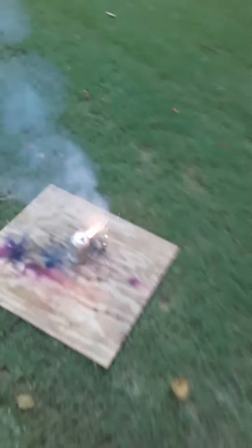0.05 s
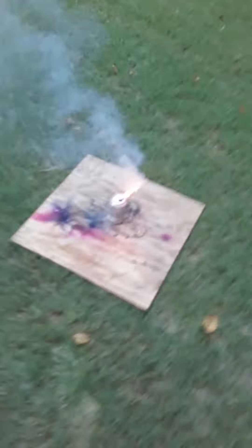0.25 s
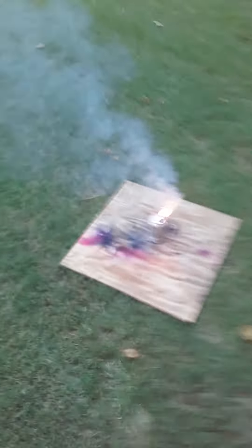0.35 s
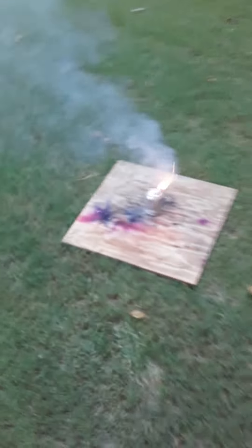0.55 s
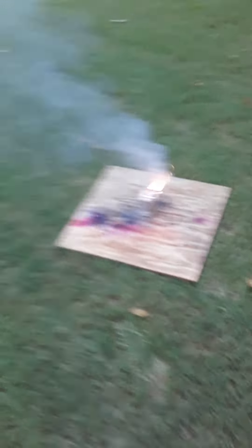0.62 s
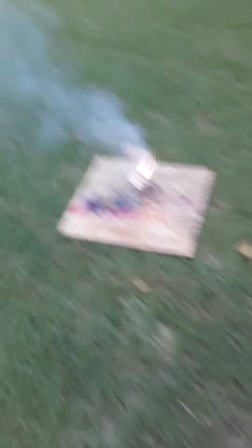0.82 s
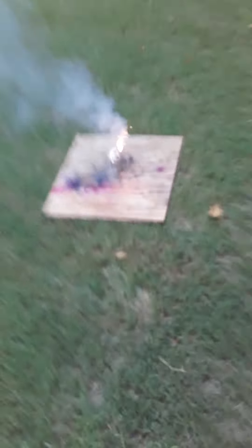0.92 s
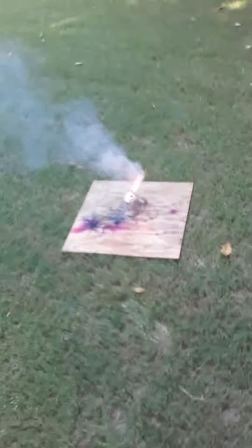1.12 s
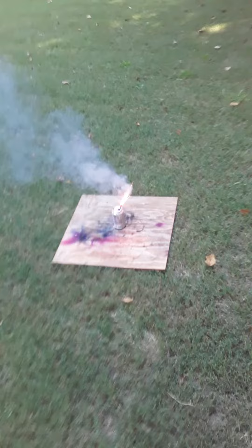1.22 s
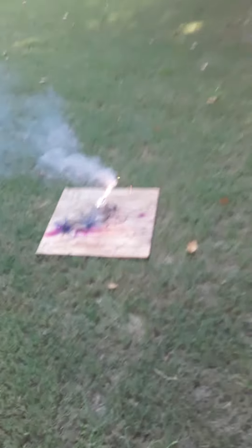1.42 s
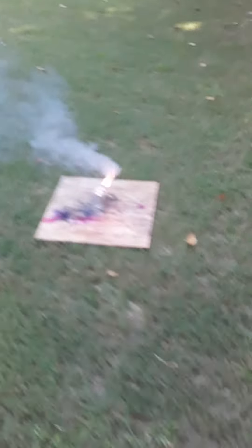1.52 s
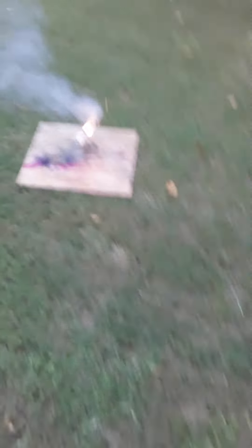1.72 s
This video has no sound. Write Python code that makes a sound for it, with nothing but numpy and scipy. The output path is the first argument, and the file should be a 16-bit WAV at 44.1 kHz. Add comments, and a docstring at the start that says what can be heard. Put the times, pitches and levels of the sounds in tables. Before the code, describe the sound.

Faint hiss of burning sparklers with tiny spits, and an early loud microphone handling thump.

```python
"""Sparklers on a lawn, with handling noise.

Sparklers burn on a board: gas hiss, a fizz of tiny sparks and a few spits, over a low outdoor murmur
and a faint hum. A finger rubs and ticks beside the right microphone port, then drags across it with
one dull thump; a limiter ducks both channels for that moment. The hand softly knocks the case."""
import sys
import numpy as np
from scipy import signal
from scipy.fft import rfft, irfft
from scipy.io import wavfile
from scipy.ndimage import uniform_filter1d

SR = 44100
rng = np.random.default_rng(int(sys.argv[2]) if len(sys.argv) > 2 else 0)


def digitize_waveform(pressure):
    """Quantize a signal to 16-bit integers and store it at the path in sys.argv[1].

    Rows of a 2-D input are taken as channels; values are limited to [-1, 1].
    """
    field = np.atleast_2d(pressure).T
    bounded = np.clip(field, -1, 1)
    quanta = np.round(bounded * 32767).astype(np.int16)
    wavfile.write(sys.argv[1], SR, quanta)


N = 77175
T = np.arange(N) / SR

# gas hiss: time_s, level_db
HISS_ENVELOPE = [(0, -49), (.17, -46.5), (.28, -51), (.45, -56), (.7, -59.5), (.98, -61), (1.09, -59),
                 (1.26, -61), (1.4, -59), (1.53, -55), (1.6, -54.5), (1.75, -52.5)]
# freq_hz, density_db
HISS_SPECTRUM = [(200, -4), (600, 0), (1200, 0.5), (2300, 1.5), (3200, -1), (4400, -9.5), (6800, -1.5),
                 (8300, -11), (10000, -8.5), (12500, -2.5), (15500, 0)]
# sizzle as the flame flares: time_s, level_db
SIZZLE_ENVELOPE = [(0, -51.5), (.35, -55), (.6, -66.5), (.98, -67.5), (1.08, -62), (1.25, -64),
                   (1.4, -59.5), (1.53, -54.5), (1.6, -61.5), (1.75, -58.5)]
# freq_hz, density_db
SIZZLE_SPECTRUM = [(500, -22), (1300, -4), (2100, 1), (3000, -2.5), (4300, -2), (5500, -4), (6700, -2.5),
                   (8300, -30.5), (15500, -19.5)]
# hiss and sizzle, right port relative to left: freq_hz, gain_db
RIGHT_EQ = [(300, -2.5), (1500, -2), (2700, 1.5), (4200, -0.5), (5500, -1), (7000, -6.5), (9000, 1),
            (12000, -5.5), (15000, -3.5)]

# outdoor murmur: time_s, level_db
MURMUR_ENVELOPE = [(0, -53.5), (.13, -52.5), (.29, -55.5), (.42, -61.5), (.7, -65), (1, -65), (1.28, -66),
                   (1.5, -58), (1.65, -58), (1.75, -57.5)]
# freq_hz, density_db
MURMUR_SPECTRUM = [(15, -57), (45, -12.5), (80, -1), (160, -0.5), (250, 0), (370, -2.5), (520, -4.5),
                   (750, -9.5), (1500, -13), (4000, -30.5)]

# skin rubbing the case: time_s, level_db
RUB_ENVELOPE = [(0, -37), (.04, -38), (.08, -38.5), (.15, -41.5), (.186, -38), (.2, -35), (.24, -46.5),
                (.35, -51.5), (.5, -56.5), (.75, -73), (1.1, -70), (1.75, -74)]
# freq_hz, density_db
RUB_SPECTRUM = [(100, -21), (1000, -14), (2900, -16.5), (4100, 1), (4800, -4), (5600, -2.5), (7600, -13.5),
                (10500, -3), (13000, -2.5), (15000, -1)]
# finger drags across the port: start_s, hold_s, level_db
DRAG_EVENTS = [(0.016, 0.007, -39), (0.1975, 0.0098, -30.5), (0.208, 0.011, -9.5)]
# freq_hz, density_db
DRAG_SPECTRUM = [(40, 0.5), (160, -4), (300, -10), (390, -9.5), (480, -4.5), (780, -1.5), (1100, -7),
                 (1450, -6.5), (2000, -19.5), (3000, -22.5), (4200, -21), (6500, -43.5), (9000, -50),
                 (15000, -45)]
# resonances of the half-covered port: freq_hz, width_hz, lift_db
PORT_MODES = [(447, 31, 8), (580, 54, 7.5), (1903, 64, 11), (2340, 110, 8.5)]
# hand knocks on the case: start_s, level_db, decay_s
KNOCK_EVENTS = [(0.0204, -30.5, 0.0033), (0.712, -52.5, 0.007)]
# freq_hz, density_db
KNOCK_SPECTRUM = [(40, -17), (120, 3.5), (300, 2.5), (600, 0.5), (900, -4.5), (1500, -10.5), (2400, -1.5),
                  (4000, -12), (7000, -17), (9000, -26)]
# skin catches on the case: start_s, level_db
TICK_EVENTS = [(0.0314, -21), (0.044, -24), (.175, -27.5), (0.1942, -15), (0.1996, -15)]
# freq_hz, density_db
TICK_SPECTRUM = [(2500, -14), (5000, -5.5), (7600, -12), (11000, -4.5), (15000, -0.5)]
# pressure jolts at the port: start_s, gain_db
JOLT_EVENTS = [(.2054, 4), (0.219, 8)]
# skin slips during the drag: start_s, level_db
SLIP_EVENTS = [(.2082, -5), (.217, -4.5)]
# port ring after a slip: freq_hz, gain_db, decay_s
SLIP_RING = [(510, 0, .0023), (799, -7.5, .0018)]

# sparkler spits: start_s, level_db, crack_decay_s, crack_share, pitch_hz
SPIT_EVENTS = [(0.362, -43, 0.0025, 0.8, 2740), (.591, -50, 0.0014, 1, 2520), (.709, -50, .002, .6, 2520),
               (1.0165, -51.5, .0008, 0.7, 2600), (1.0327, -42.5, 0.00099, 0.83, 2330),
               (1.092, -48, .002, 0, 2660), (1.147, -51, 0.0009, 0.6, 2600),
               (1.5436, -45, .0007, 0.1, 2960), (1.5606, -39, 0.0012, 0.01, 1770),
               (1.6283, -37, 0.00039, 0.07, 2230)]
# crack of a spark: freq_hz, density_db
CRACK_SPECTRUM = [(300, 1), (2000, -21.5), (6000, -3), (8300, 1), (12000, 7), (16000, 10)]
# pop of a spit: pitch_ratio, gain_db, decay_s
POP_MODES = [(1, -4.5, .0012), (1.42, -4, .0005), (2.17, 2.5, .0005)]


def amp(db):
    """Decibels to gain."""
    return 10 ** (np.asarray(db) / 20)


def unit(x):
    """Scale to rms 1."""
    return x / np.sqrt(np.mean(x ** 2))


def curve(points):
    """Gain over time from (time_s, level_db) points."""
    return amp(np.interp(T, *np.array(points).T))


def colour(x, points):
    """Filter by (freq_hz, gain_db) points on a log-frequency axis."""
    hz, db = np.array(points).T
    bins_hz = np.maximum(np.fft.rfftfreq(N, 1 / SR), 1)
    return irfft(rfft(x) * amp(np.interp(np.log(bins_hz), np.log(hz), db)), N)


def noise(spectrum, channels=1):
    """Coloured noise, rms 1, independent per channel."""
    return unit(colour(rng.standard_normal((channels, N)), spectrum))


def walk(rate_hz):
    """Smooth random wander, rms 1."""
    step = max(int(SR / rate_hz), 1)
    return unit(uniform_filter1d(rng.standard_normal(N)[np.arange(N) // step], step))


def grains(per_s, spread_db):
    """Random clicks of uneven size."""
    size = amp(spread_db * np.minimum(rng.exponential(size=N), 5))
    return (rng.random(N) < per_s / SR) * size * rng.choice([-1, 1], N)


def burst(x, start_s, attack_s, decay_s, hold_s=0):
    """Attack-hold-decay cut of x, rms 1 at its top."""
    env = np.exp(np.minimum(T - start_s, 0) / attack_s - np.maximum(T - start_s - hold_s, 0) / decay_s)
    return x * env * np.sqrt(np.mean(env ** 2) / np.mean((x * env) ** 2))


def ring(age_s, modes):
    """Sum of damped sines."""
    return sum(amp(db) * np.sin(2 * np.pi * hz * age_s) * np.exp(-age_s / decay_s)
               for hz, db, decay_s in modes)


def at_right_port(x, left_db=-56.5):
    """Sound on the right port, leaking faintly left."""
    return x * np.array([[amp(left_db)], [1]])


def sparklers(fizz_db=-9, flicker_db=1.25):
    """Gas hiss and the sizzle of tiny sparks, flickering together."""
    sparks = np.array([grains(per_s=2200, spread_db=2.5) for _ in range(2)])
    hiss = unit(noise(HISS_SPECTRUM, channels=2) + amp(fizz_db) * unit(colour(sparks, HISS_SPECTRUM)))
    sizzle = unit(noise(SIZZLE_SPECTRUM, channels=2) + unit(colour(sparks, SIZZLE_SPECTRUM)))
    burn = hiss * curve(HISS_ENVELOPE) + sizzle * curve(SIZZLE_ENVELOPE)
    left, right = burn * amp(flicker_db * walk(rate_hz=45.1))
    return np.array([left, colour(right, RIGHT_EQ)])


def sputter(gain_db=-19.5):
    """Small sparks crack at random, following the hiss level."""
    cracks = unit(colour(grains(per_s=190, spread_db=3.5), CRACK_SPECTRUM))
    return cracks * amp(gain_db) * curve(HISS_ENVELOPE)


def outdoors(side_db=-13.5, hum_hz=238.6, hum_db=-8.5, waver_ratio=0.014, waver_db=3.2):
    """Low, near-mono murmur with a wavering hum."""
    mid = noise(MURMUR_SPECTRUM)
    side = amp(side_db) * noise(MURMUR_SPECTRUM) * np.array([[1], [-1]])
    pitch_hz = hum_hz * (1 + waver_ratio * walk(rate_hz=25.08))
    hum = unit(np.sin(2 * np.pi * np.cumsum(pitch_hz) / SR) * amp(waver_db * walk(rate_hz=8.9)))
    return (mid + side + amp(hum_db) * hum) * curve(MURMUR_ENVELOPE)


def rubbing(flicker_db=1.2):
    """Skin slides on the case: a bright, grainy rustle."""
    friction = unit(colour(grains(per_s=6000, spread_db=3), RUB_SPECTRUM))
    slide = friction * curve(RUB_ENVELOPE) * amp(flicker_db * walk(rate_hz=120))
    return at_right_port(slide, left_db=-46.5)


def drags():
    """The finger scrapes over the port, exciting its resonances."""
    bins_hz = np.fft.rfftfreq(N, 1 / SR)
    port = 1 + sum((amp(db) - 1) / (1 + 2j * (bins_hz - hz) / width_hz)
                   for hz, width_hz, db in PORT_MODES)
    scrape = irfft(rfft(noise(DRAG_SPECTRUM)) * port, N)
    return at_right_port(sum(amp(db) * burst(scrape, start_s, hold_s=hold_s, attack_s=0.0013,
                                             decay_s=0.0016) for start_s, hold_s, db in DRAG_EVENTS))


def knocks(uncorrelated_db=6.5):
    """The hand shifts grip and bumps the case, heard at both ports."""
    case = noise(KNOCK_SPECTRUM) + amp(uncorrelated_db) * noise(KNOCK_SPECTRUM, channels=2)
    return sum(amp(db) * burst(case, start_s, attack_s=0.00038, decay_s=decay_s)
               for start_s, db, decay_s in KNOCK_EVENTS)


def ticks():
    """Skin catches sharply on the case."""
    skin = noise(TICK_SPECTRUM)
    catches = sum(amp(db) * burst(skin, start_s, attack_s=0.0001, decay_s=0.00025)
                  for start_s, db in TICK_EVENTS)
    return at_right_port(catches, left_db=-39.5)


def jolts(pitch_hz=84, rise_s=0.0039, decay_s=0.004):
    """Sealing and freeing the port each give a low, heavily damped swing."""
    omega = 2 * np.pi * pitch_hz
    pressure = 0
    for start_s, db in JOLT_EVENTS:
        age_s = np.maximum(T - start_s, 0)
        env = (1 - np.exp(-(age_s / rise_s) ** 2)) * np.exp(-age_s / decay_s)
        swing = env * np.sin(omega * age_s)
        pressure -= amp(db) * np.gradient(swing) * SR / omega  # follows the swing's speed
    return at_right_port(pressure)


def slips():
    """Skin lets go with a snap that briefly rings the port."""
    snaps = sum(amp(db) * ring(np.maximum(T - start_s, 0), SLIP_RING) for start_s, db in SLIP_EVENTS)
    return at_right_port(snaps)


def spits(pop_rise_s=0.00012):
    """Larger sparks burst with a bright crack and a short pitched pop."""
    bright = noise(CRACK_SPECTRUM, channels=2)
    out = 0
    for start_s, db, crack_decay_s, crack_share, pitch_hz in SPIT_EVENTS:
        age_s = np.maximum(T - start_s, 0)
        crack = burst(bright, start_s, attack_s=0.00014, decay_s=crack_decay_s)
        modes = [(pitch_hz * ratio, gain_db, decay_s) for ratio, gain_db, decay_s in POP_MODES]
        pop = ring(age_s, modes) * (1 - np.exp(-age_s / pop_rise_s))
        out += amp(db) * (np.sqrt(crack_share) * crack + np.sqrt(1 - crack_share) * pop)
    return out


def scene():
    """Sparklers and lawn, plus handling noise."""
    handling = rubbing() + drags() + knocks() + ticks() + jolts() + slips()
    return sparklers() + sputter() + outdoors() + handling + spits()


def record(dry):
    """Fast stereo-linked look-ahead limiter, then a steep low-pass."""
    ceiling_db, attack_db_per_s, release_db_per_s, cutoff_hz = -1, 1497.5, 897, 15850
    over_db = np.maximum(20 * np.log10(np.abs(dry).max(axis=0) + 1e-9) - ceiling_db, 0)
    release_db = np.maximum.accumulate(over_db + release_db_per_s * T) - release_db_per_s * T
    attack_db = np.maximum.accumulate((over_db - attack_db_per_s * T)[::-1])[::-1] + attack_db_per_s * T
    duck_db = uniform_filter1d(np.maximum(release_db, attack_db), size=64)
    lowpass = signal.ellip(12, 0.2, 80, cutoff_hz, fs=SR, output="sos")
    return signal.sosfilt(lowpass, dry * amp(-duck_db))


dry = scene()
out = record(dry)
digitize_waveform(out)
```